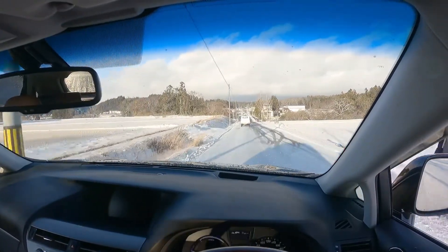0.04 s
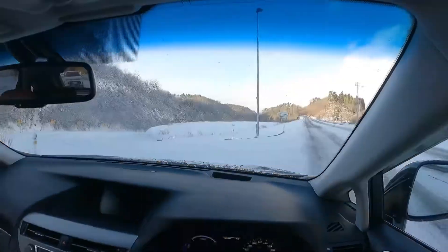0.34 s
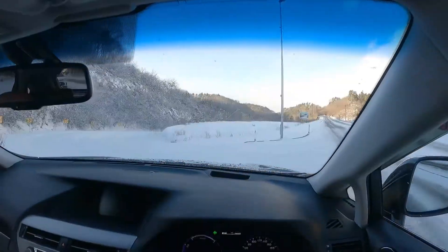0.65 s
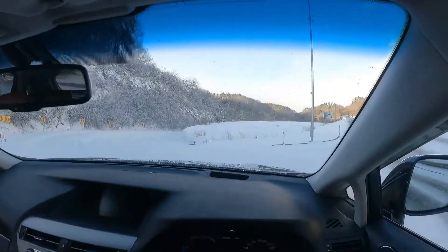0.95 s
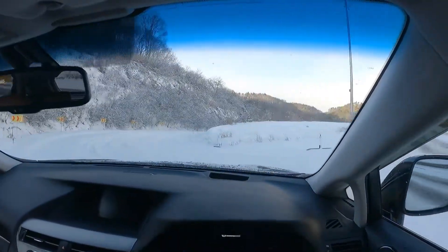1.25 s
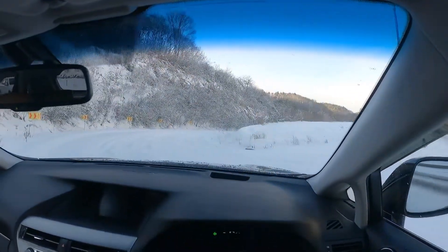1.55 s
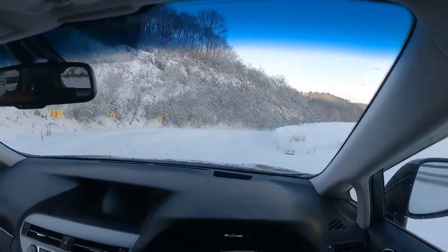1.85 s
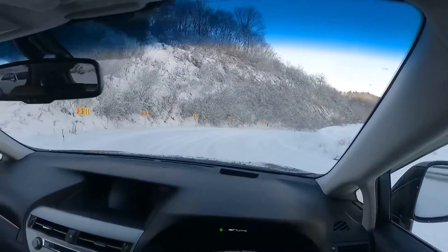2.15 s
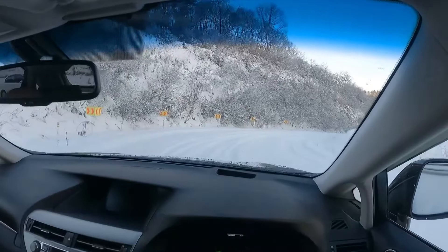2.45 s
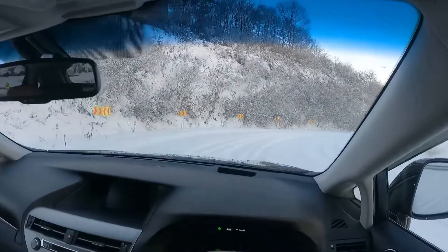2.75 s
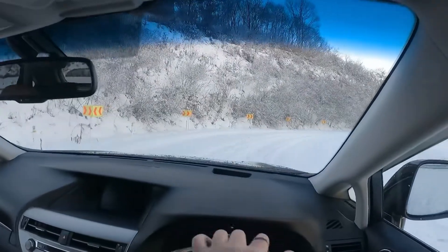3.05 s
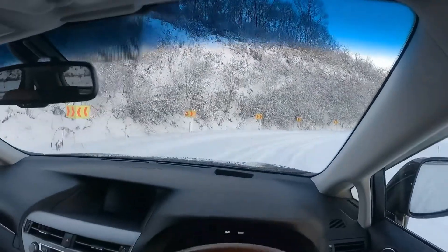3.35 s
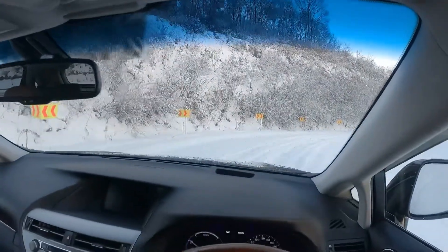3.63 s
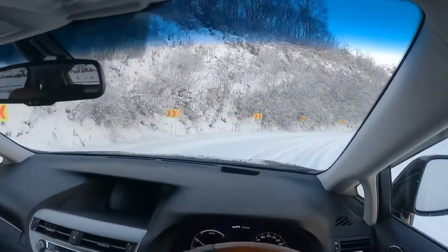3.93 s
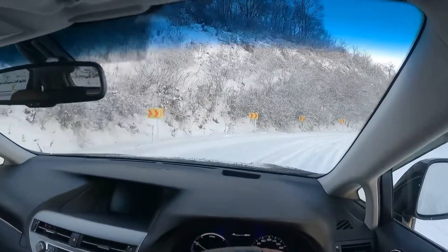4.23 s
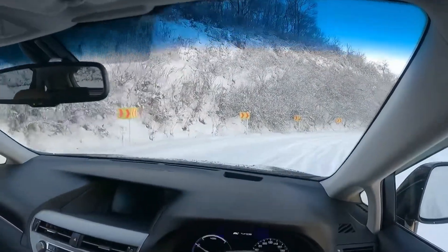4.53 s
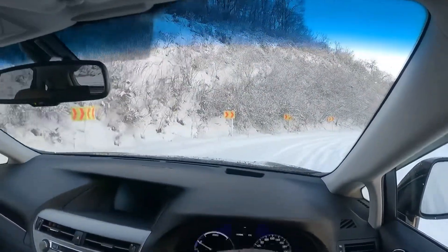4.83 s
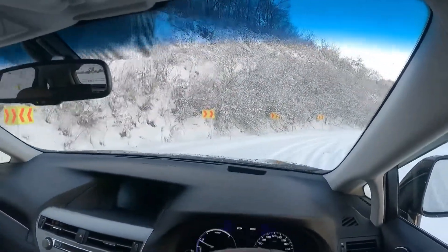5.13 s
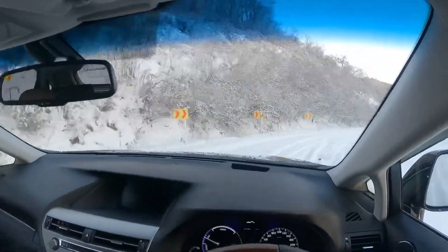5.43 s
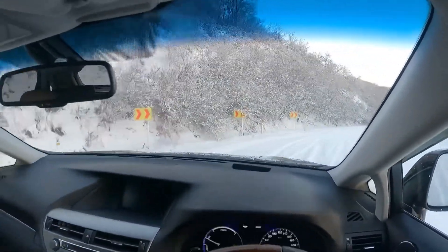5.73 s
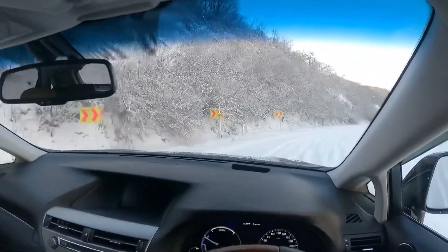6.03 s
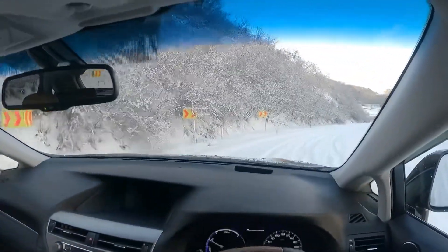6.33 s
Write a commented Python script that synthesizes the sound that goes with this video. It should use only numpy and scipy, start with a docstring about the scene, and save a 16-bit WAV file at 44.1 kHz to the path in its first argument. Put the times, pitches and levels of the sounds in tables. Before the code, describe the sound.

A deep, uneven rumble fills the cabin of a moving car for about six and a half seconds, heard from the driver's seat. It opens with a smooth rush of fast road and two low thumps, cut off by a sharp click at 0.3 seconds. A duller tyre roar and a soft fluttering hiss of snow take over, while ruts thump the suspension irregularly throughout. Loose plastic ticks faintly from 0.5 seconds and gives a sharp double crack near 2.3 seconds. From 3 to 4 seconds the trim clicks and rattles busily, with a hollow lid bouncing loudest at about 3.2 seconds and knocking again at 3.6 and 3.8. After that the plastic settles into faint scuffs, with one more click near 5.4 seconds. The low boom swells slightly from about 4.6 seconds and continues to the end.

```python
"""Inside a car on a snow-packed road: a short rush of fast road, then a cut with a sharp click
to a long, slower stretch. The uneven road forces the body into a deep boom on its springs,
the panels drum the cabin air, and ruts thump the suspension. Impacts excite the damped modes of
loose plastic and a hollow lid, which click, rattle and bounce; friction makes the trim scuff
and squeak. Underneath, the tyres roar and hiss on the snow as broadband noise."""
import sys
import numpy as np
from scipy import signal
from scipy.fft import rfft, irfft
from scipy.io import wavfile
from scipy.ndimage import uniform_filter1d, minimum_filter1d

SR = 44100
rng = np.random.default_rng(int(sys.argv[2]) if len(sys.argv) > 2 else 0)


def generate_wav(sig):
    """Save sig (samples, or channels by samples) to the path in sys.argv[1] as 16-bit PCM at SR."""
    pcm = np.round(np.clip(np.atleast_2d(sig).T, -1, 1) * 32767).astype(np.int16)
    wavfile.write(sys.argv[1], SR, pcm)


N = 285768
TIME = np.arange(N) / SR
FREQ = np.maximum(np.fft.rfftfreq(N, 1 / SR), 1)


# Spectra of the body's boom and the cabin's drumming. Each row: frequency in Hz, level in dB.
BOOM_SPECTRUM = [(5, -30), (12, -11), (19, -6), (24, -4.5), (31, 0), (39, -3.5), (49, -12), (62, -18.5),
                 (85, -29.5), (200, -69.5)]
DRUM_SPECTRUM = [(45, -17.5), (70, -2), (88, 2), (100, 0.5), (117, 2), (138, -2.5), (152, -11), (176, -7.5),
                 (203, -20), (235, -23), (280, -31.5), (420, -52.5), (900, -88.5)]
# How strongly the road drives each. Each row: time in seconds, level in dB.
BOOM_LEVELS = [(0, -23), (.39, -8.5), (.52, -18.5), (.64, -11), (.95, -19.5), (1.29, -11.5), (1.42, -23),
               (1.65, -14.5), (2.0, -18), (2.28, -10.5), (2.52, -19.5), (2.8, -11.5), (3.1, -13),
               (3.4, -14), (3.7, -15.5), (4.1, -14.5), (4.65, -9.5), (5.0, -11), (5.3, -10), (5.42, -15),
               (5.9, -9.5), (6.08, -15), (6.48, -12.5)]
DRUM_LEVELS = [(0, -19.5), (.47, -21), (.58, -18.5), (1.3, -20.5), (1.7, -21.5), (2.02, -21), (2.1, -14),
               (2.32, -20), (2.8, -18), (3.25, -22), (3.62, -18), (4.6, -16), (4.85, -20), (5.35, -16.5),
               (5.58, -21.5), (5.75, -20), (6.48, -18.5)]

def body():
    """Forced vibration: the uneven road shakes the sprung body, and its panels drum the cabin air."""
    (boom_db,), (drum_db,) = curves(BOOM_LEVELS), curves(DRUM_LEVELS)
    boom = undb(boom_db + 3.5 + 1.6 * walk(16)) * rumble(BOOM_SPECTRUM, evenness=0.87)
    drum = undb(drum_db - 0.56 + 1.83 * walk(22)) * rumble(DRUM_SPECTRUM, evenness=0.52)
    thumps = ruts(decay_cycles=0.84, gain_db=4.0, thud_ratio=1.83, thud_db=-21.5)
    return boom + (drum + thumps) * pan(-0.33)


def rumble(spectrum, evenness):
    """A randomly driven resonator: its phase wanders while its amplitude stays fairly even."""
    gain = undb(along(spectrum))
    wave = noise(gain)
    power = uniform_filter1d(np.abs(signal.hilbert(wave[0])) ** 2, SR // 25)
    wave = wave / (power + 0.024) ** (evenness / 2)
    wave = irfft(rfft(wave) * np.minimum(1, 20 * gain), N)  # confined to its own band
    return wave / wave.std()


# Ruts in the snow. Each row: time of the peak in seconds, level in dB, pitch in Hz.
RUT_THUMPS = [(0.024, -1.5, 81.8), (.255, -5, 88), (.32, -22, 199), (.594, -19.5, 139), (0.698, -18, 157),
              (0.844, -11, 101), (1.048, -5.5, 119), (1.26, -6.5, 111), (1.399, -7.5, 127),
              (1.77, -17.5, 157), (1.822, -15, 189), (1.894, -3.5, 135), (2.074, -9.5, 117),
              (2.118, -14, 123), (2.152, -7, 109), (2.231, -15.5, 169), (2.38, -4, 102.5),
              (2.701, -14, 129), (2.756, -19, 195), (2.817, -8, 103), (2.849, -10, 140), (2.996, -5.5, 115),
              (3.086, -22, 300), (3.103, -9.5, 131), (3.389, -11, 147), (3.431, -18, 192),
              (3.465, -21.5, 220), (3.547, -11, 147), (3.612, -9, 128), (3.676, -10, 167),
              (3.791, -20.5, 224), (3.816, -3, 125), (3.843, -24, 240), (4.023, -9.5, 119),
              (4.128, -7, 122), (4.172, -11.5, 126), (4.238, -10, 135), (4.334, -9, 124), (4.38, -17, 135),
              (4.451, -12, 139), (4.508, -13.5, 128), (4.602, -5, 134), (4.663, -7, 120),
              (4.715, -8.5, 138), (4.805, -14.5, 116), (5.022, -10.5, 135), (5.093, -7.5, 152),
              (5.35, -18, 160), (5.414, -12.5, 155), (5.654, -12, 131), (5.731, -8.5, 125),
              (5.778, -13, 139), (6.122, -8, 118)]

def ruts(decay_cycles, gain_db, thud_ratio, thud_db):
    """Heavy damping: a rut swings the cabin air for a few cycles, with a shorter, higher panel thud."""
    out = np.zeros(N)
    for peak_s, db, hz in RUT_THUMPS:
        near = np.abs(TIME - peak_s) * hz < 10
        cycles = (TIME[near] - peak_s) * hz
        swell = np.exp(-np.hypot(cycles, .2) / decay_cycles)
        phase = 2 * np.pi * rng.random()
        push = swell * np.cos(2 * np.pi * cycles + phase)
        thud = undb(thud_db) * swell ** 2 * np.cos(2 * np.pi * thud_ratio * cycles + phase)
        out[near] += undb(db + gain_db) * (push + thud)
    return out


# Knocks of loose plastic. Each row: start in seconds, clack level in dB, contact hardness in dB,
# nominal 60 dB decay time in seconds, note of the touched part in Hz.
PLASTIC_KNOCKS = [(0.53, -51, -7.5, 0.069, 1720), (0.646, -52, 9, 0.046, 2820),
                  (0.674, -53, -7.5, 0.067, 2340), (0.934, -57, -6, 0.046, 1700),
                  (.966, -53, 0.5, 0.034, 3500), (.989, -49.5, -1.5, 0.06, 3450),
                  (1.091, -53.5, -3, 0.077, 6640), (1.234, -47, -3, 0.026, 1910),
                  (1.327, -39, -3, 0.069, 3700), (1.580, -52.5, -1.5, 0.021, 3750),
                  (1.67, -48.5, 1, 0.077, 3400), (1.922, -54.5, -1.5, 0.06, 1500),
                  (1.96, -57, -2, 0.065, 1700), (2.011, -48, 4, 0.066, 2850),
                  (2.246, -36, -10, 0.018, 3200), (2.2623, -25, -6, 0.024, 4100),
                  (2.284, -29, 6, 0.04, 1710), (2.355, -42, -2, 0.037, 1790),
                  (2.695, -40.5, -1, 0.07, 1860), (3.004, -26.5, 2.5, 0.063, 6200),
                  (3.038, -40, 0, 0.038, 3020), (3.067, -44, 4, 0.034, 3970), (3.113, -54, -3, 0.031, 1200),
                  (3.154, -46, -2, .025, 7000), (3.2078, -28, 1, 0.069, 4970),
                  (3.226, -30, 7.5, 0.074, 7600), (3.2496, -31.5, 4, 0.11, 1300),
                  (3.2903, -33, 10, 0.058, 7300), (3.391, -39, 9, 0.026, 7660),
                  (3.478, -47, 2.5, 0.12, 4300), (3.5203, -27.5, -2, 0.11, 3370),
                  (3.598, -32, -8, 0.025, 1170), (3.604, -38, 11.5, 0.067, 4140),
                  (3.629, -49, 9, 0.035, 6000), (3.735, -38.5, -1, 0.04, 4950),
                  (3.838, -29.5, 1, 0.046, 990), (3.9442, -34.5, 1, 0.048, 3440),
                  (4.005, -44, -2, 0.077, 2000), (4.382, -59.5, 10, 0.06, 7050),
                  (4.676, -53, -4, .025, 1500), (5.441, -37, 0.5, 0.063, 2100)]
PLASTIC_PAN_DB = -1.5

def knocks():
    """Impact excitation: stronger blows are brighter and more sudden; the parts buzz as they settle."""
    out = np.zeros((2, N + SR))
    for start_s, clack_db, hard_db, t60, note_hz in PLASTIC_KNOCKS:
        force_db = clack_db + 40.5  # relative to a middling knock
        # a hard contact trades hollow knock for tick
        hollow_db = -32 + 0.16 * force_db - 0.94 * hard_db
        tick_db = -47.5 + 0.62 * force_db + hard_db
        rise_s = 0.0016 * undb(-.4 * force_db)
        hit = contact((hollow_db, clack_db, tick_db), t60, rise_s, tail_db=-25, tail_t60=0.46)
        hit += undb(clack_db - 2.5) * note(note_hz, t60 + 0.015, relative_width=0.14)
        i = int(start_s * SR)
        out[:, i:i + hit.shape[1]] += hit * pan(PLASTIC_PAN_DB)
    buzz = undb(2.0 * walk(350))
    return out[:, :N] * buzz


# Spectra of a knock's three parts. Each row: frequency in Hz, level in dB.
HOLLOW_SPECTRUM = [(150, -12.5), (340, 13.5), (600, 3), (790, -1), (1400, -7), (2100, -3), (3200, -10.5),
                   (8000, -57.5)]
CLACK_SPECTRUM = [(900, -23), (2200, -1), (3300, 1), (6000, -1), (7500, -6.5), (10000, -29.5), (15000, -44)]
TICK_SPECTRUM = [(4000, -29), (7300, 2), (10000, -6), (12500, -13), (15000, -11.5)]

def contact(levels_db, t60, rise_s, tail_db, tail_t60):
    """Free decay after one blow: higher bands die sooner, and long knocks start more softly."""
    t, freq = axes(1 / 4)
    modes = plastic_response(freq, spread_db=9.5)
    softness = t60 / 0.042
    attack = np.minimum(1, t / (rise_s * softness))
    since_peak = np.maximum(0, t - rise_s * softness)
    cabin_tail = softness * undb(tail_db - 60 * t / tail_t60)
    spectra = HOLLOW_SPECTRUM, CLACK_SPECTRUM, TICK_SPECTRUM
    out = 0
    for db, spectrum, share in zip(levels_db, spectra, (1.0, .85, .75)):
        fade = undb(-60 * since_peak / (t60 * share)) + cabin_tail
        band = noise(undb(along(spectrum, freq)) * modes, freq)
        out += undb(db - 2.5) * fade * attack * band
    return out


# Modes of the plastic. Each row: frequency in Hz, bandwidth in Hz, level in dB.
PLASTIC_MODES = [(600, 230, 0.5), (875, 170, -1), (1150, 210, 7.5), (1370, 70, 6.5), (1750, 280, -1.5),
                 (3490, 120, -5), (3960, 200, -1.5), (4700, 660, -2), (5940, 880, -6), (8000, 65, -3.5),
                 (9900, 1000, -9), (11800, 660, -4)]

def plastic_response(freq, spread_db):
    """Modal superposition: each point of contact excites the modes in its own proportions."""
    return 1 + sum(undb(db + spread_db * rng.standard_normal()) * resonance(freq, hz, width_hz)
                   for hz, width_hz, db in PLASTIC_MODES)


def note(hz, t60, relative_width):
    """Modal overlap: the close modes of the touched part ring as one narrow band of noise."""
    t, freq = axes(1 / 4)
    cluster = noise(resonance(freq, hz, hz * relative_width), freq)
    attack = 1 - np.exp(-t / 0.00045)
    return cluster * undb(-60 * t / t60) * attack


# Cracks of a catch. Each row: start in seconds, level in dB, pitch in Hz, upper band edge in Hz.
CATCH_CRACKS = [(2.2629, -18.5, 3850, 9100), (2.2632, -25, 1900, 5000), (2.2838, -24.5, 1700, 12000),
                (3.2096, -13, 1310, 8900), (3.2145, -33, 1590, 7000), (3.2243, -16.5, 1500, 13000),
                (3.241, -31, 1400, 10000), (3.253, -19, 1300, 7000), (3.2645, -29, 2220, 11000),
                (3.2906, -28, 7360, 13000), (3.5208, -16.5, 5660, 7340), (6.006, -36, 4300, 6000)]

def cracks(t60, width_hz, peak_db):
    """Sudden release: a catch lets go in a broadband transient, mostly at the sharpest knocks."""
    t, freq = axes(1 / 20)
    fade = undb(-60 * t / t60)
    out = np.zeros((2, N))
    for start_s, db, hz, top_hz in CATCH_CRACKS:
        peak = 1 + undb(peak_db) * resonance(freq, hz, width_hz)
        band = freq / (freq + 500) / np.hypot(1, freq / 5000)
        top_cut = 1 / np.hypot(1, (freq / top_hz) ** 16)
        crack = noise(peak * band * top_cut, freq) * fade
        i = int(start_s * SR)
        out[:, i:i + len(t)] += undb(db) * crack * fade.std() / crack.std()
    return out * pan(PLASTIC_PAN_DB)


# Bounces of the lid. Each row: start in seconds, level in dB, share of the free decay time.
LID_BOUNCES = [(3.2092, -10.5, 0.94), (3.2149, -20, 1), (3.226, -20, 0.53), (3.251, -28, 0.91),
               (3.2578, -20, 1), (3.266, -21, 1), (3.273, -30, 1), (3.6001, -18.5, 0.7),
               (3.842, -17.5, 0.6)]
# Its modes. Each row: frequency in Hz, level in dB, free 60 dB decay time in seconds.
LID_MODES = [(245, -3.5, 0.078), (352, 0.5, 0.044), (470, -1, 0.045), (581, -2, 0.05), (684, -22, 0.061),
             (900, -13, 0.061), (1134, -11, 0.041), (1210, -14.5, 0.067), (1330, -2, 0.013),
             (1400, -14, 0.084), (1583, -16, 0.052), (2150, -28, 0.045)]

def lid(spread_db, phase_scatter, detune):
    """Modal ringing: each bounce of a hollow lid on its catch starts a set of damped sinusoids."""
    t, _ = axes(1 / 4)
    attack = 1 - np.exp(-t / 0.0014)
    out = np.zeros((2, N + SR))
    for start_s, hit_db, ring_share in LID_BOUNCES:
        i = int(start_s * SR)
        for hz, db, t60 in LID_MODES:
            strength, phase, skew, seat = rng.standard_normal(4)
            hz *= 1 + detune * seat  # the lid seats differently at each bounce
            stereo_phase = skew * hz / 2900 * SIDES
            wave = np.sin(2 * np.pi * hz * t + phase_scatter * phase + stereo_phase)
            fade = undb(hit_db + db + spread_db * strength - 60 * t / (t60 * ring_share))
            out[:, i:i + len(t)] += fade * attack * wave
    return out[:, :N] * pan(-1.2)


# Plastic shifting on its seat. Each row: centre in seconds, level in dB, half length in seconds,
# spectral tilt in dB per octave.
SCUFF_SWELLS = [(0.414, -43, .01, -3), (0.498, -41.5, 0.013, -2), (0.64, -33, 0.0064, -3.5),
                (0.73, -43, 0.0071, 1.5), (0.77, -50.5, 0.0054, 7), (1.17, -39.5, 0.011, -1.5),
                (1.974, -41, 0.0066, -2.5), (2.19, -40, 0.0077, -3), (2.621, -41, 0.014, 0),
                (2.635, -32, 0.0042, -3), (3.199, -29.5, 0.0062, 3.5), (3.262, -34.5, 0.012, 9.5),
                (3.463, -39.5, 0.012, -2), (3.558, -46, 0.014, 14), (3.707, -35.5, 0.0093, -0.5),
                (4.189, -42, 0.017, -1), (4.272, -47, 0.047, 3), (4.421, -45, 0.01, 0.5),
                (4.56, -57, 0.072, 3), (4.88, -40.5, 0.018, 0.5), (5.09, -46.5, 0.024, -2.5),
                (5.225, -41, 0.0056, -3), (5.388, -42.5, 0.026, 1), (5.771, -50, 0.0057, 6),
                (5.81, -35.5, 0.0094, -2.5), (5.822, -36, 0.02, -0.5), (5.887, -44, 0.02, 4),
                (5.926, -48, 0.0044, 5), (5.967, -37.5, 0.018, 1.5), (6.018, -50, 0.0088, 6),
                (6.38, -42, 0.023, -0.5)]
# Spectrum of the rubbing. Each row: frequency in Hz, level in dB.
SCUFF_SPECTRUM = [(200, -9), (550, 5), (850, -3), (1700, -0.5), (2300, -6), (2800, -11), (4600, -17),
                  (7000, -25), (14000, -58)]

def scuffs(stir_db):
    """Sliding friction: plastic rubs in tiny slips, in short swells over a faint restless stirring."""
    t, freq = axes(1 / 6)
    middle = len(t) // 2
    stir = undb(stir_db + 2.0 * walk(31)) * noise(undb(along(SCUFF_SPECTRUM)))
    out = np.pad(stir, ((0, 0), (0, SR)))
    for centre_s, db, half_s, tilt_db in SCUFF_SWELLS:
        colour = undb(along(SCUFF_SPECTRUM, freq) + tilt_db * np.log2(freq / 1000))
        colour *= plastic_response(freq, spread_db=4.0) ** .5
        swell = np.exp(-((t - t[middle]) / half_s) ** 2)
        i = int(centre_s * SR) - middle
        out[:, i:i + len(t)] += undb(db) * swell * noise(colour, freq)
    slips = undb(3.5 * walk(1400) - .8)
    return out[:, :N] * slips * pan(-5.5)


# Thin squeaks. Each row: centre in seconds, level in dB, pitch in Hz, half length in seconds.
TRIM_SQUEAKS = [(0.291, -44, 1762, 0.021), (3.16, -54, 9300, 0.0097), (3.18, -55, 7900, .008)]

def squeaks(waver):
    """Stick-slip oscillation: rubbing trim holds one unsteady pitch for a moment."""
    out = np.zeros(N)
    for centre_s, db, hz, half_s in TRIM_SQUEAKS:
        cycles = np.cumsum(hz + waver * np.sqrt(hz) * walk(500)) / SR
        swell = np.exp(-((TIME - centre_s) / half_s) ** 2)
        out += undb(db) * swell * np.sin(2 * np.pi * cycles)
    return out * pan(PLASTIC_PAN_DB)


# Tyres on the slower stretch. Each row: time in seconds, roar level in dB, snow hiss level in dB.
TYRE_LEVELS = [(.36, -47, -61), (.7, -45.5, -51.5), (.92, -44.5, -59), (1.22, -44.5, -50),
               (1.83, -46, -61.5), (2.25, -41, -48.5), (2.58, -44, -54.5), (2.85, -42, -48),
               (3.13, -43.5, -48.5), (3.45, -43.5, -49), (3.82, -41.5, -46.5), (4.05, -44, -54),
               (4.55, -43.5, -54.5), (4.76, -45, -57), (5.6, -47, -57), (5.93, -42, -51),
               (6.18, -47, -55.5)]
# Spectra of the tyre noises. Each row: frequency in Hz, level in dB.
ROAR_SPECTRUM = [(130, -4.5), (260, 4.5), (340, 3.5), (430, -2.5), (580, -8), (700, -11.5), (850, -13.5),
                 (1150, -14.5), (1450, -17), (2100, -36.5), (4000, -53.5), (12000, -73.5)]
HISS_SPECTRUM = [(900, 5), (2000, 2), (3300, -.5), (5800, -3.5), (7400, -6.5), (8600, -13), (12000, -19),
                 (15000, -38)]
RUSH_SPECTRUM = [(150, 17.5), (330, -3.5), (580, -8.5), (850, -14), (1150, -13.5), (1800, -20), (3100, -26),
                 (5900, -29), (7000, -36), (10000, -45), (15000, -58)]
CUT_S = .344

def tyres():
    """Rolling noise: a smooth rush of fast road; after the cut, a duller roar and fluttering hiss."""
    roar_db, hiss_db = curves(TYRE_LEVELS)
    patches_db = 1.3 * walk(22)
    roar = undb(roar_db + 5.5 + patches_db) * noise(undb(along(ROAR_SPECTRUM)))
    hiss = undb(hiss_db - 2.5 + patches_db + 0.62 * walk(150)) * noise(undb(along(HISS_SPECTRUM)))
    rush = undb(-28 + .5 * walk(29)) * noise(undb(along(RUSH_SPECTRUM)) * (FREQ > 150))
    return np.where(TIME < CUT_S, rush * pan(-1.3), roar * pan(-.7) + hiss * pan(-.8))


def click(db, decay_s):
    """A band-limited impulse: one sharp click at the cut."""
    impulse = np.exp(-2j * np.pi * FREQ * CUT_S)
    band = FREQ / (FREQ + 150) / (1 + 2j * np.pi * FREQ * decay_s)
    return undb(db) * irfft(impulse * band, N)


# Echoes from windscreen, side glass and dashboard. Each row: delay in seconds, signed gain.
EARLY_ECHOES = [(.0019, 0.042), (.0037, -0.11), (.0052, 0.13), (.0074, 0.13), (0.0118, -0.14)]

def reflections(sound):
    """Comb filtering: near surfaces, too small to reflect long waves, echo the treble."""
    echoes = sum(gain * np.exp(-2j * np.pi * FREQ * delay_s) for delay_s, gain in EARLY_ECHOES)
    treble = FREQ ** 2 / (FREQ ** 2 + 900 ** 2)
    return irfft(rfft(sound) * (1 + echoes * treble), N)


# Likeness of the two channels. Each row: frequency in Hz, correlation.
COHERENCE = [(30, .99997), (60, .9995), (120, .997), (250, .988), (500, .8), (1200, .68), (4000, .66),
             (12000, .5)]
SIDES = np.array([[1], [-1]])  # left, right

def noise(gain, freq=FREQ):
    """Spatial coherence: shaped stereo noise of rms 1 whose long waves reach both channels alike."""
    mid, side = rfft(rng.standard_normal((2, 2 * len(freq) - 2)))
    alike = along(COHERENCE, freq)
    wave = irfft(gain * (np.sqrt(1 + alike) * mid + np.sqrt(1 - alike) * side * SIDES))
    return wave / wave.std()


def walk(rate_hz):
    """Random modulation: held levels, smoothed twice, with a standard deviation of 1."""
    hold = int(SR / rate_hz)
    steps = np.repeat(rng.standard_normal(N)[:N // hold + 1], hold)
    smooth = uniform_filter1d(uniform_filter1d(steps, hold), hold)[:N]
    return smooth / smooth.std()


def resonance(freq, hz, width_hz):
    """A resonance curve of height 1, with its full width taken at half height."""
    return 1 / (1 + ((freq - hz) / (width_hz / 2)) ** 2)


def axes(length_s):
    """Time and frequency axes of a short event."""
    size = int(SR * length_s) // 2 * 2
    return np.arange(size) / SR, np.maximum(np.fft.rfftfreq(size, 1 / SR), 1)


def along(points, freq=FREQ):
    """Interpolation of (Hz, value) rows on a log-frequency axis."""
    hz, value = np.transpose(points)
    return np.interp(np.log(freq), np.log(hz), value)


def curves(table):
    """Interpolation of each column of a timed table, sample by sample."""
    times, *columns = np.transpose(table)
    return [np.interp(TIME, times, column) for column in columns]


def undb(db):
    """Decibels to amplitude gain."""
    return 10 ** (np.asarray(db) / 20)


def pan(db):
    """Level panning: channel gains for a left minus right level."""
    return undb(SIDES * db / 2)


def scene():
    """Superposition of all the sources at the driver's seat."""
    plastic = knocks() + cracks(t60=0.013, width_hz=560, peak_db=17.0) + scuffs(stir_db=-58.5)
    direct = body() + lid(spread_db=1.44, phase_scatter=1.4, detune=0.029) + squeaks(waver=.7)
    return direct + reflections(tyres() + plastic) + click(db=3.5, decay_s=0.00017)


def record(dry):
    """Look-ahead limiting holds the boom within full scale; a low-pass filter cuts the top."""
    hold, top_hz = SR // 125, 13800
    safe_gain = np.minimum(1, 1 / (np.abs(dry).max(axis=0) + 1e-9))
    held_gain = minimum_filter1d(safe_gain, 2 * hold)
    gain = uniform_filter1d(uniform_filter1d(held_gain, hold), hold)
    low_pass = signal.ellip(8, .2, 70, top_hz, fs=SR, output="sos")
    return signal.sosfilt(low_pass, dry * gain)


dry = scene()
out = record(dry)
generate_wav(out)
```